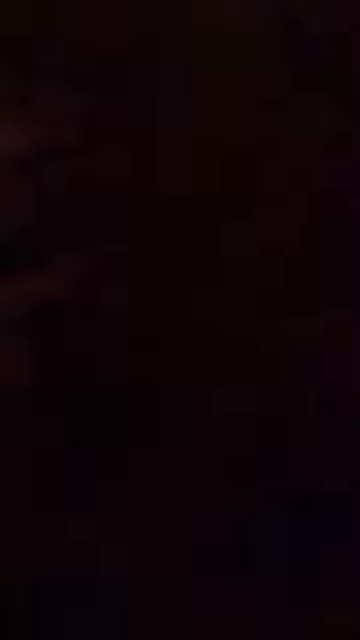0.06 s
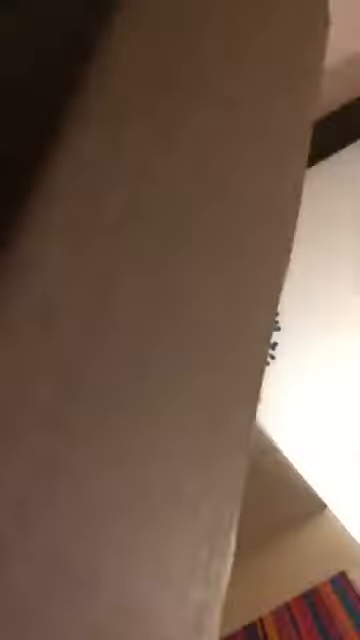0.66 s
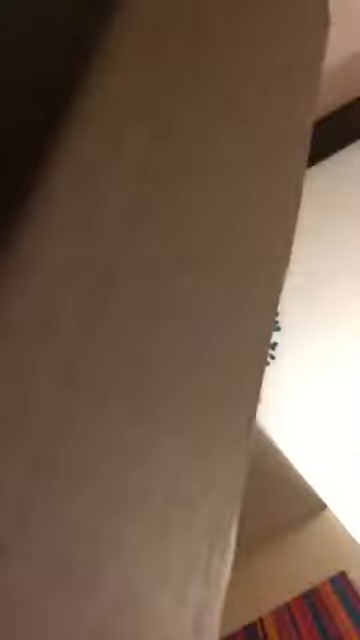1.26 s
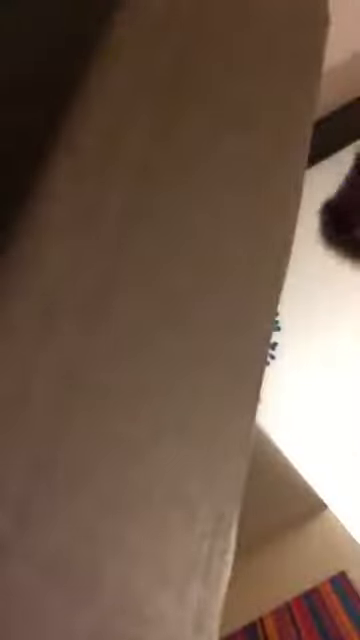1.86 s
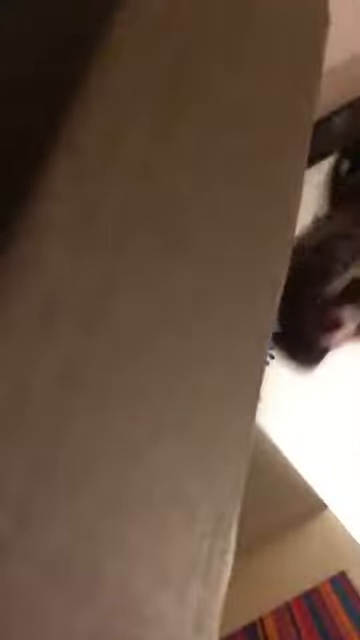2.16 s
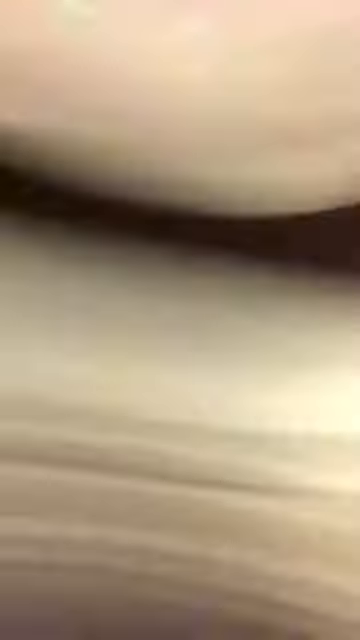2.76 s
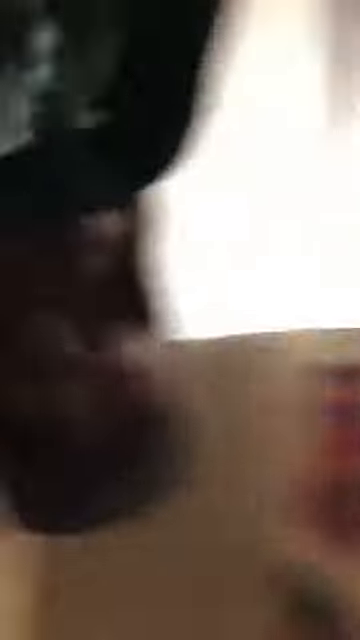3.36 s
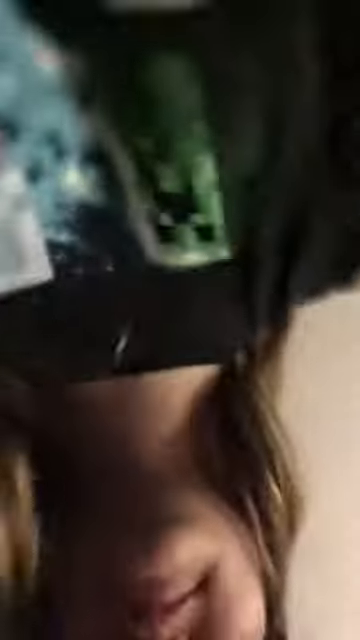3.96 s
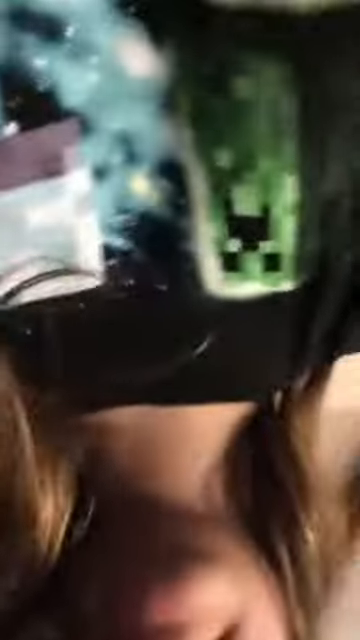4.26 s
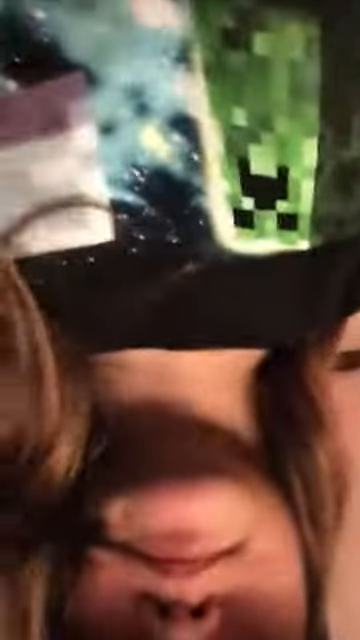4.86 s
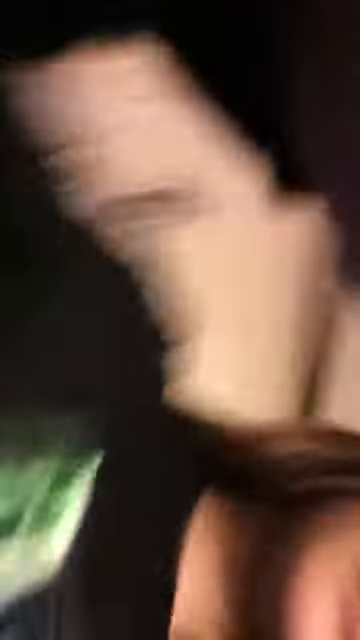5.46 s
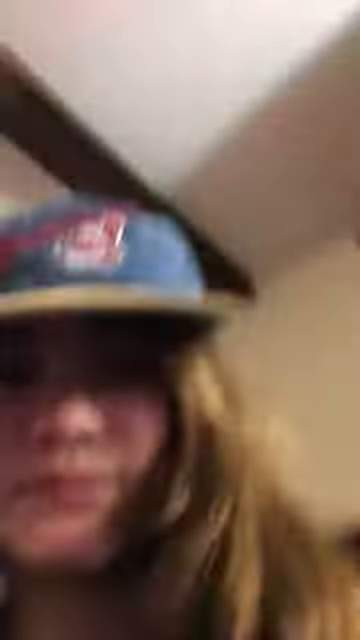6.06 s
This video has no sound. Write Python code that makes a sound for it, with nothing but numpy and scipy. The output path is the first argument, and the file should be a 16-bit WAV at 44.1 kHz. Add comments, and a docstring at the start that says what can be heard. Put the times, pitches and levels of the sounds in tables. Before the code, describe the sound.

A phone is handled in a quiet room, heard very close through its own microphone over a faint electrical hum and hiss. In the first 0.6 seconds it is put down: the case gives several loud, short knocks while skin and fabric scrape across the microphone, ending in a low finger thump. The room tone dips briefly, then carries on almost alone. At about 2.5 seconds the phone is picked up with more knocks, dull bumps and raspy rubbing, and a sharp click at 2.8 seconds. The scrapes die away by about 3.3 seconds. A few small clicks and soft bumps follow between 3.5 and 5 seconds as the grip shifts. From 4.5 seconds sleeves rustle faintly nearby, a little more toward the end, with a light click at 6 seconds. The room tone drops out for an instant twice in this last stretch.

```python
"""A quiet room with a faint mains hum, heard from the microphone of a phone that is being handled.
First the phone is put down: its case knocks, fingers press on it in soft bumps, and skin and fabric
scrape right across the microphone port. After a lull it is picked up at about 2.5 s, with more knocks
and scrapes. The hand then shifts its grip with a few small clicks, and from 4.5 s clothes rustle nearby.
Whenever the port is covered, once early on and twice near the end, the room briefly fades."""
import sys
import numpy as np
from scipy import signal
from scipy.fft import rfft, irfft, next_fast_len
from scipy.io import wavfile
from scipy.ndimage import map_coordinates

SR = 44100
rng = np.random.default_rng(int(sys.argv[2]) if len(sys.argv) > 2 else 0)


def digitize_waveform(pressure):
    """Quantize a signal to 16-bit integers and store it at the path in sys.argv[1].

    Rows of a 2-D input are taken as channels; values are limited to [-1, 1].
    """
    field = np.atleast_2d(pressure).T
    bounded = np.clip(field, -1, 1)
    quanta = np.round(bounded * 32767).astype(np.int16)
    wavfile.write(sys.argv[1], SR, quanta)


N = 268833
TIME = np.arange(N) / SR

# friction heard through the phone's shell: (frequency [Hz], level [dB])
SHELL_SPECTRUM = [(60, -23.5), (160, 0.5), (300, -7), (550, 5), (900, -4), (1400, -7.5), (2000, -9),
                  (3200, -27), (8000, -58.5)]
# low rumble of skin dragging on the case: (frequency [Hz], level [dB])
DRAG_SPECTRUM = [(35, -18), (70, 1.5), (160, 4), (260, -3), (450, -7), (700, -18), (1100, -32), (1800, -46),
                 (3500, -74.5)]


def amp(db):
    """Decibels to gain."""
    return 10 ** (np.asarray(db) / 20)


def unit(x):
    """Scale to rms 1."""
    return x / np.sqrt(np.mean(x ** 2) + 1e-20)


def gain_at(points, hz):
    """Gain of (frequency [Hz], level [dB]) points on a log axis."""
    f, db = np.transpose(points)
    return amp(np.interp(np.log(hz + 1), np.log(f + 1), db))


def fader(points):
    """Gain at every sample from (time [s], level [dB]) points."""
    return amp(np.interp(TIME, *np.transpose(points)))


def filtered(x, response):
    """Filter x by a function of frequency."""
    m = next_fast_len(len(x) + SR // 4)
    return irfft(rfft(x, m) * response(np.fft.rfftfreq(m, 1 / SR)), m)[:len(x)]


def impulse(points, size=1024):
    """Causal click with the given spectrum and peak 1."""
    cepstrum = irfft(np.log(gain_at(points, np.fft.rfftfreq(size, 1 / SR))))
    cepstrum[1:size // 2] *= 2
    cepstrum[size // 2 + 1:] = 0
    click = irfft(np.exp(rfft(cepstrum)))
    return click / np.abs(click).max()


def wobble(rate):
    """Smooth random curve, rate knots a second."""
    return map_coordinates(rng.standard_normal(int(N * rate / SR) + 4), [TIME * rate], order=3)


def grainy_noise(spectrum, grain_db, grain_hz):
    """Noise of rms 1 that clumps, as friction does in tiny catches and releases."""
    catches = rng.standard_normal(N) * amp(grain_db * np.clip(wobble(grain_hz), -2, 2))
    return unit(filtered(catches, lambda hz: gain_at(spectrum, hz)))


def stroke(s, rise, fall):
    """Strength of one slide: it swells to 1 at time s and runs out."""
    shape = np.zeros(N)
    near = np.abs(TIME - s) < 6 * max(rise, fall)
    t = TIME[near] - s
    shape[near] = np.exp(-np.where(t < 0, (t / rise) ** 2, np.abs(t / fall) ** 1.2))
    return shape


def add(track, s, sound):
    """Mix a sound in from time s."""
    part = track[max(round(s * SR), 0):][:len(sound)]
    part += sound[:len(part)]


def room_tone(drone_db=-65.5, hiss_db=-64.5, hum_db=-0.45, waver_db=1.5, crossover_hz=500):
    """All around the microphone: a low drone and a slightly unsteady mains hum, under a faint hiss."""
    # the room's background noise: (frequency [Hz], level [dB])
    air_spectrum = [(30, -29.5), (48, -12), (62, -5), (88, -8.5), (120, -6.5), (175, -9.5), (250, -9.5),
                    (315, -10.5), (420, -13.5), (500, -15.5), (800, -21.5), (2000, -26.5), (5000, -33),
                    (15500, -35)]
    # tones of the hum: (frequency [Hz], level [dB])
    hum_tones = [(59.2, -73), (118.4, -74), (166, -80.5), (208, -79.5), (236.9, -78), (280.5, -83),
                 (355.3, -75), (413.5, -73)]
    # drone and hum change as the phone turns: (time [s], level [dB])
    low_levels = [(1, -2), (2.2, -0.5), (3.35, -8), (3.7, -7), (3.87, 2), (4.4, 1), (5.1, -3), (6.1, -0.5)]
    # the hiss above them: (time [s], level [dB])
    hiss_levels = [(1, -5), (2.5, -1.5), (3.9, -1), (6.1, 0.5)]
    air = grainy_noise(air_spectrum, grain_db=2.36, grain_hz=30)
    drone = filtered(air, lambda hz: 1 / (1 + (hz / crossover_hz) ** 6))
    hum = np.zeros(N)
    for hz, db in hum_tones:
        rms = amp(db + hum_db + waver_db * wobble(1.6))
        hum += rms * np.sqrt(2) * np.sin(2 * np.pi * hz * TIME + 0.5 * wobble(0.94))
    hiss = amp(hiss_db) * fader(hiss_levels) * (air - drone)
    return fader(low_levels) * (amp(drone_db) * drone + hum) + hiss


def hand_gap(hz):
    """Response of the hollow between case and hand: unity with a resonant lift at each mode."""
    # resonances of the gap: (frequency [Hz], width [Hz], lift [dB])
    modes = [(480, 43, 0), (850, 99, 0.5), (1050, 10, 0.5), (1420, 410, 2), (2394, 350, 3), (2970, 45, 4.5),
             (3600, 140, 0.5)]
    return 1 + sum((amp(db) - 1) * 1j * hz * width / (centre ** 2 - hz ** 2 + 1j * hz * width)
                   for centre, width, db in modes)


def hand_reflection(x, delay_s, wander, share):
    """The hand close to the port sends back a copy, cutting notches that shift as it moves."""
    lag = delay_s * SR * np.exp(wander * wobble(3.9))
    reflection = map_coordinates(x, [np.arange(N) - lag], order=3)
    return (x + share * reflection) / np.hypot(1, share)


def scrapes(rumble_db=-12, shell_db=0.5, rasp_db=-0.5, rumble_tilt=2.2, shell_limit_db=12,
            bite=0.44, bite_from_db=-45):
    """Dull rubs rumble and growl in the shell, bright ones hiss; hard ones rasp on the port's rim."""
    # skin and fabric slide over the port: (time [s], rise [s], fall [s], level [dB], brightness [dB])
    rubs = [(.01, .05, .03, -79.5, -25), (0.2676, .003, 0.0045, -38, 7.5), (.308, .003, .005, -36.5, 5),
            (.329, .007, .01, -34.5, -2.5), (.364, .03, 0.1, -50, -3), (.416, 0.006, 0.0036, -37, -6.5),
            (.462, .002, .005, -42, 4), (.498, .012, 0.0089, -50, -11), (.536, .008, 0.007, -50.5, -9),
            (.555, .002, .004, -40, 2), (.605, .008, 0.0066, -34.5, -0.5), (.63, .003, .003, -45.5, -1),
            (2.335, 0.022, .02, -68, -11.5), (2.58, 0.023, 0.051, -41.5, -9.5),
            (2.659, .026, 0.025, -45.5, -9), (2.736, .015, .028, -31, -0.5),
            (2.765, .014, 0.028, -33, -5.5), (2.815, .01, .035, -47, -11), (2.916, .02, 0.025, -50, -4),
            (2.937, .004, .009, -43.5, -5.5), (2.952, .003, .005, -41.5, 7.5),
            (2.993, .004, .011, -54, -1.5), (3.1, 0.0153, .025, -50, 1), (3.203, .028, .014, -49.5, 2),
            (3.778, .008, 0.023, -68, -3), (3.997, .015, .012, -76, 0)]
    # friction on the rim: (frequency [Hz], level [dB])
    rasp_spectrum = [(800, -33.5), (1800, 1.5), (2600, -2.5), (3600, -3.5), (5500, -8.5), (7500, -12.5),
                     (14000, -49.5)]
    # friction of a bright rub: (frequency [Hz], level [dB])
    hiss_spectrum = [(3000, -33.5), (6000, -1.5), (7400, -3), (9000, 1.5), (11500, -0.5), (13500, -7),
                     (16000, -11.5)]
    power = np.zeros((4, N))
    for s, rise, fall, db, bright in rubs:
        offsets_db = [-rumble_tilt * bright, min(-bright, shell_limit_db),
                      bite * (db - bite_from_db), bright]
        power += amp(db + np.array(offsets_db))[:, None] ** 2 * stroke(s, rise, fall) ** 2
    rumble, shell, rasp, hiss = np.sqrt(power)
    stick_slip = unit(amp(1.2 * wobble(260)))
    sound = amp(shell_db) * shell * grainy_noise(SHELL_SPECTRUM, grain_db=3.5, grain_hz=190)
    sound += amp(rasp_db) * rasp * stick_slip * grainy_noise(rasp_spectrum, grain_db=5, grain_hz=2000)
    sound += hiss * stick_slip * grainy_noise(hiss_spectrum, grain_db=5.5, grain_hz=2200)
    past_finger = hand_reflection(sound, delay_s=0.000185, wander=0.42, share=0.41)
    past_palm = hand_reflection(past_finger, delay_s=0.00085, wander=0.06, share=0.23)
    drag = amp(rumble_db) * rumble * grainy_noise(DRAG_SPECTRUM, grain_db=0.5, grain_hz=52)
    return filtered(past_palm, hand_gap) + drag


def strike(hz, decay_s, edge_db, chatter=0.3, upper_ratio=2.1, upper_db=-4, damped_hz=650,
           body_db=-1, tick_db=-2, grit=0.2, grit_t60=0.0037):
    """The hand-damped case rings briefly and chatters; a hard edge adds a gritty tick."""
    # contact of a hard edge: (frequency [Hz], level [dB])
    tick_spectrum = [(300, -27), (1200, -11.5), (2000, -5), (2750, 3), (3600, -5), (5500, -11), (8000, -13),
                     (16000, -30)]
    t = np.arange(SR // 8) / SR
    upper = amp(upper_db) / (1 + (hz / damped_hz) ** 4)  # the grip swallows high overtones
    ring = np.sin(2 * np.pi * hz * t) + upper * np.sin(2 * np.pi * hz * upper_ratio * t)
    rattle = unit(filtered(rng.standard_normal(len(t)), lambda f: (f / hz) / (1 + (f / hz) ** 3)))
    body = ring * amp(-60 * t / (0.65 * decay_s)) + chatter * rattle * amp(-60 * t / (1.5 * decay_s))
    cushion = signal.butter(3, min(2 * hz, SR / 3), fs=SR)
    contact = (t == 0) + grit * rng.standard_normal(len(t)) * amp(-60 * t / grit_t60)
    tick = signal.fftconvolve(contact / np.linalg.norm(contact), impulse(tick_spectrum))[:len(t)]
    return amp(body_db) * signal.lfilter(*cushion, body) + amp(edge_db + tick_db) * tick


def thump(s, hz, rise_cycles=0.39, sag=0.12):
    """A push swings the air at the port a few times, ever slower as the contact relaxes."""
    out = np.zeros(N)
    near = np.abs(TIME - s) < 8 / hz
    cycles = (TIME[near] - s) * hz
    swell = np.exp(-(cycles / rise_cycles) ** 2)
    fade = 1 / np.cosh(cycles * np.sqrt(2))
    turns = (1 - np.exp(-sag * cycles)) / sag
    out[near] = np.where(cycles < 0, swell, fade) * np.cos(2 * np.pi * turns)
    return out


def knocks(rebound_s=0.005, rebound_db=-9.5, rebound_ratio=1.3,
           skid_db=-19.5, skid_per_edge=0.26, skid_rise_s=0.0033, thump_lag_s=0.0046, judder_db=-12.5):
    """Each knock rings the case, rebounds, skids and swings the handset with a juddering thump."""
    # the phone bumps into something: (time [s], level [dB], ring [Hz], decay [s],
    # relative edge tick [dB], thump level [dB], thump pitch [Hz])
    bumps = [(0.0564, -21, 471, 0.025, -86, -20, 215), (.194, -18.5, 470, 0.066, -44.5, -7, 124.5),
             (0.2314, -9.5, 450, 0.024, -9, -1, 179.3), (0.2661, -9.5, 562, .032, -17.5, -27.5, 199),
             (.411, -11, 850, 0.057, -11, -30.5, 160), (0.4456, -4.5, 517.8, 0.032, -16.5, -6, 127.3),
             (.48, -19, 701, 0.053, -17.5, -26, 140), (0.54, -10, 385, 0.027, -14.5, -3, 96.4),
             (2.547, -14, 820, 0.033, -7.5, -17.5, 219), (2.5619, -6.5, 850, 0.035, -9, -14, 176),
             (2.7747, -17, 480, 0.019, -2.5, -18, 108.6), (2.8059, -9.5, 510.4, 0.022, -6, -16.5, 95.5)]
    out = np.zeros(N)
    skid = filtered(grainy_noise(SHELL_SPECTRUM, grain_db=5, grain_hz=220), hand_gap)
    skin_judder = grainy_noise(DRAG_SPECTRUM, grain_db=-0.5, grain_hz=47)
    for s, db, hz, decay_s, edge_db, thump_db, thump_hz in bumps:
        add(out, s, amp(db) * strike(hz, decay_s, edge_db))
        # pressed harder by the second touch, the case rings higher
        add(out, s + rebound_s, amp(db + rebound_db) * strike(hz * rebound_ratio, decay_s, edge_db))
        skid_gain = amp(db + skid_db + skid_per_edge * edge_db)  # soft contacts skid less
        out += skid_gain * stroke(s + skid_rise_s, skid_rise_s, fall=0.011) * skid
        out += amp(thump_db) * thump(s + thump_lag_s, thump_hz)
        out += amp(thump_db + judder_db) * stroke(s + thump_lag_s, rise=0.009, fall=0.011) * skin_judder
    return out


def fingers():
    """Fingertips press without ringing the case; the holding hand rumbles faintly."""
    # soft presses on the case: (time [s], level [dB], pitch [Hz])
    presses = [(0.077, -29, 122), (0.6, -1.5, 98.7), (0.64, -26, 83.4), (2.339, -29, 155),
               (2.651, -18.5, 84.1), (2.671, -16, 84), (3.157, -45.5, 111), (3.37, -42.5, 83),
               (3.43, -45.5, 86.5), (3.784, -40.5, 80), (3.977, -43, 110), (4.48, -53, 110),
               (5.599, -42.5, 75), (5.995, -51.5, 169)]
    # rumble of the holding hand: (time [s], level [dB])
    grip_levels = [(1.2, -79), (1.5, -67.5), (2.2, -66), (3.4, -68), (4.1, -79), (4.5, -69), (5.1, -83),
                   (5.65, -61.5), (6.1, -74.5)]
    bumps = sum(amp(db) * thump(s, hz) for s, db, hz in presses)
    return bumps + fader(grip_levels) * grainy_noise(DRAG_SPECTRUM, grain_db=4, grain_hz=40)


def air_pockets(q=7, sag_octaves_per_s=0.88):
    """Friction rings the air between finger and port; the note sinks as the finger closes the gap."""
    # short hollow notes under a sliding finger: (time [s], rise [s], fall [s], level [dB], pitch [Hz])
    notes = [(.226, 0.0062, .009, -42.5, 2750), (.33, 0.0044, 0.028, -47.5, 3600),
             (0.414, .005, .01, -29, 1400), (2.58, .02, .03, -35.5, 917), (2.748, .025, 0.039, -35.5, 4298),
             (2.81, .005, .014, -28, 490), (2.912, .02, .03, -46, 1308), (3.095, .012, 0.016, -63, 3870),
             (3.205, .022, .012, -55, 2462)]
    out = np.zeros(N)
    t = np.arange(-SR // 8, SR // 4) / SR
    for s, rise, fall, db, hz in notes:
        half_band = signal.butter(2, hz / q / 2, fs=SR)
        noise = signal.lfilter(*half_band, rng.standard_normal((2, len(t))))
        phase = 2 * np.pi * np.cumsum(hz * 2 ** (-sag_octaves_per_s * t)) / SR
        note = np.zeros(N)
        add(note, s + t[0], unit(noise[0] * np.cos(phase) + noise[1] * np.sin(phase)))
        out += amp(db) * stroke(s, rise, fall) * note
    return out


def clicks():
    """Contacts too light to move the handset only ring the case."""
    # fingernails and the flexing case: (time [s], level [dB], ring [Hz], decay [s], relative tick [dB])
    contacts = [(.2312, -30, 2710, 0.037, -10.5), (.3059, -26, 1400, 0.023, -0.5),
                (.3203, -27.5, 800, .022, -14), (2.8051, -3.5, 2806, 0.011, 1),
                (3.527, -46.5, 501, 0.026, -2.5), (3.7935, -35.5, 460, 0.027, -3),
                (3.7933, -42.5, 2680, 0.011, -22), (3.9942, -36, 619, 0.0073, -7),
                (4.4917, -54, 3540, .006, -7), (4.5187, -51.5, 1493, 0.017, 3),
                (4.969, -52, 1395, 0.05, -21), (4.975, -44.5, 762, .045, -27),
                (5.995, -43.5, 1050, 0.023, -3.5), (6.057, -54, 804, .027, -14)]
    out = np.zeros(N)
    for s, db, hz, decay_s, edge_db in contacts:
        add(out, s, amp(db) * strike(hz, decay_s, edge_db))
    return out


def port_cover(edge_s=0.0039):
    """Gain of the room at the microphone, which drops while the port is covered."""
    # the room is shut out: (start [s], end [s], depth [dB])
    covers = [(0.665, 0.907, -10.5), (5.125, 5.16, -10), (6.031, 6.058, -19.5)]
    covered_db = sum(depth * (np.tanh((TIME - start) / edge_s) - np.tanh((TIME - end) / edge_s)) / 2
                     for start, end, depth in covers)
    return amp(covered_db)


def sleeves(rustle_db=-1):
    """Sleeves brush along near the microphone as the arm turns."""
    # a sleeve passes: (time [s], half length [s], rustle level [dB], swish level [dB])
    brushes = [(4.503, .035, -68.5, -71), (4.673, .03, -66, -66.5), (4.721, 0.0147, -62.5, -83),
               (5.201, 0.029, -72, -66.5), (5.254, .02, -62, -68.5), (5.359, .02, -62.5, -73),
               (5.565, 0.024, -63.5, -75.5), (5.561, .14, -70.5, -72), (5.665, 0.016, -57, -61.5),
               (5.745, .055, -73, -58), (5.862, .03, -57.5, -65)]
    # midrange friction of cloth: (frequency [Hz], level [dB])
    rustle_spectrum = [(250, -11), (700, 2.5), (1600, -5.5), (3000, -8), (5000, -11), (8000, -27.5)]
    # treble friction of cloth: (frequency [Hz], level [dB])
    swish_spectrum = [(3000, -13.5), (6000, -4.5), (7800, -8), (10000, 1), (13000, -7), (16000, -9)]
    rustle = grainy_noise(rustle_spectrum, grain_db=2.5, grain_hz=440)
    swish = grainy_noise(swish_spectrum, grain_db=1.5, grain_hz=450)
    return sum(stroke(s, half, half) * (amp(rustle_db + low_db) * rustle + amp(high_db) * swish)
               for s, half, low_db, high_db in brushes)


def scene():
    """One microphone hears the handling on its own case, the sleeves nearby and the room beyond."""
    handling = knocks() + clicks() + fingers() + scrapes() + air_pockets()
    return (handling + sleeves() + port_cover() * room_tone())[None]


def record(dry, low_hz=45, top_hz=16300):
    """The phone sheds the deepest bass, rounds off peaks near full scale and limits the band."""
    thin = filtered(dry[0], lambda hz: 1 - 1 / (1 + (hz / low_hz) ** 8))
    rounded = thin / (1 + thin ** 8) ** (1 / 8)
    return filtered(rounded, lambda hz: hz < top_hz)[None]


dry = scene()
out = record(dry)
digitize_waveform(out)
```